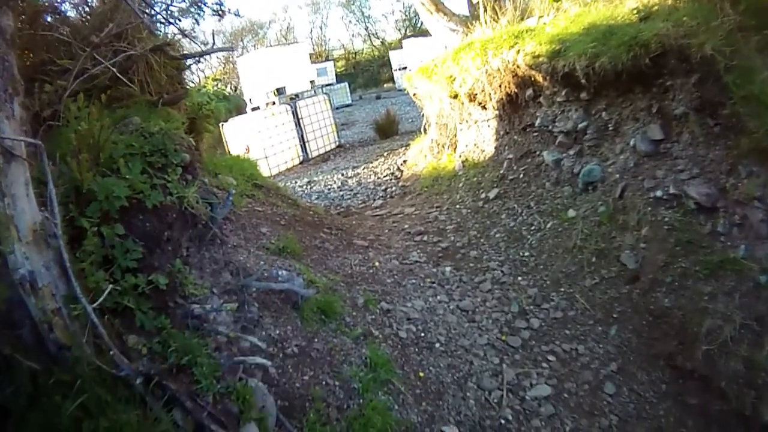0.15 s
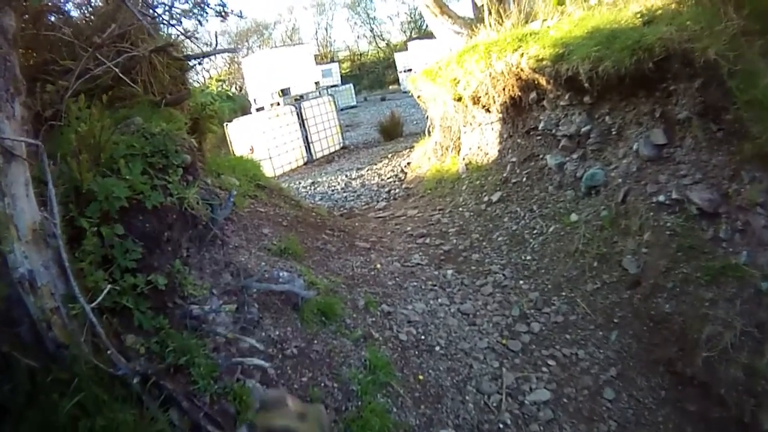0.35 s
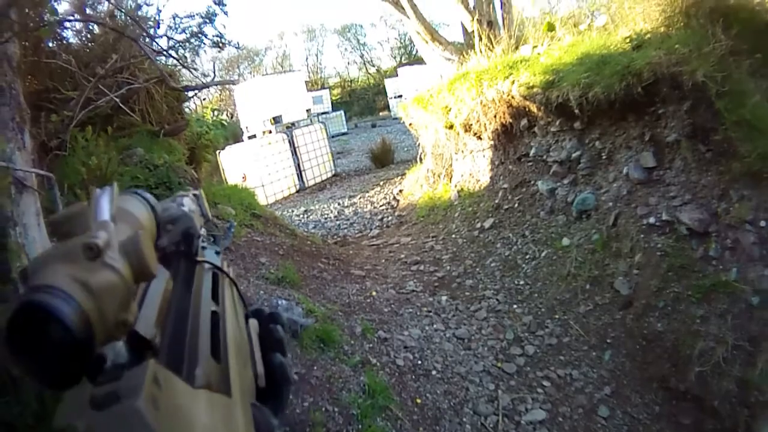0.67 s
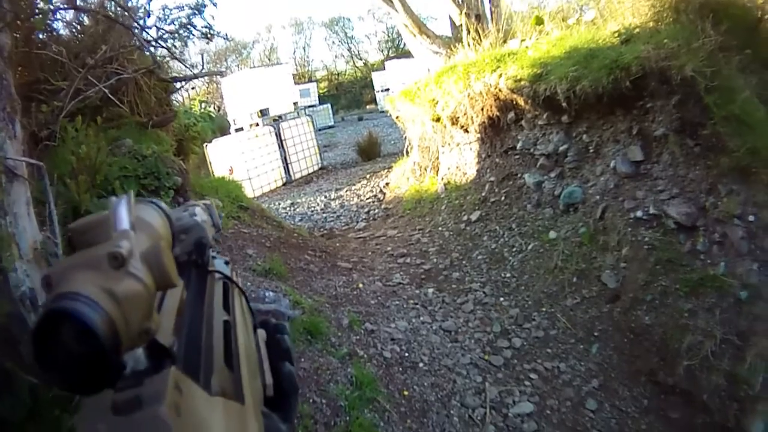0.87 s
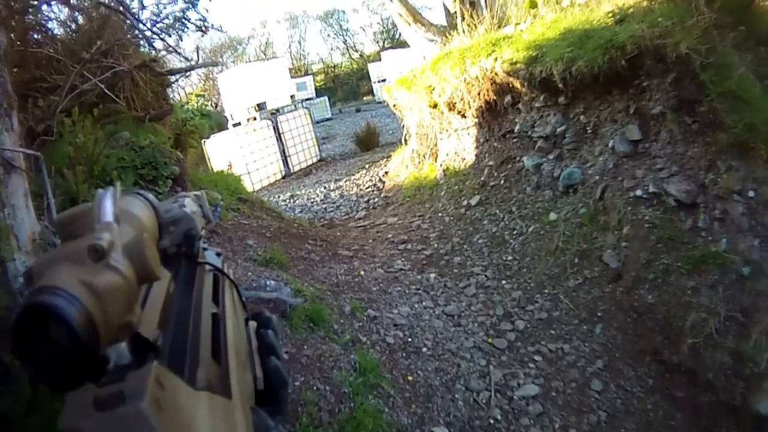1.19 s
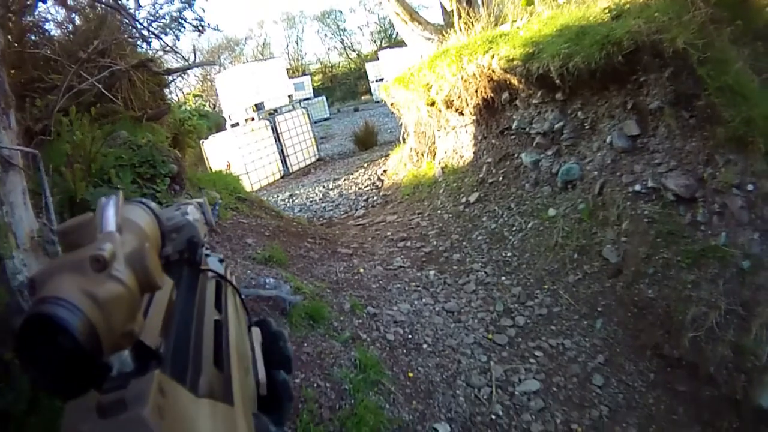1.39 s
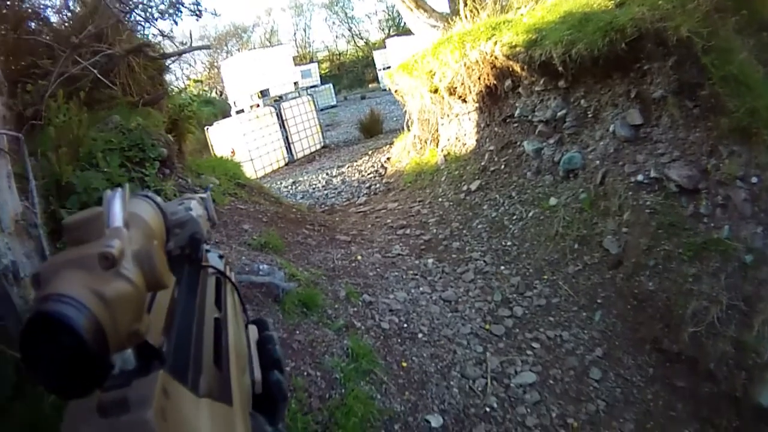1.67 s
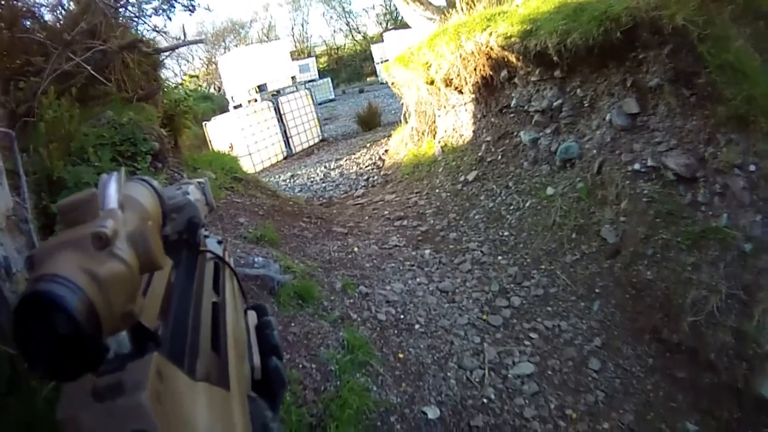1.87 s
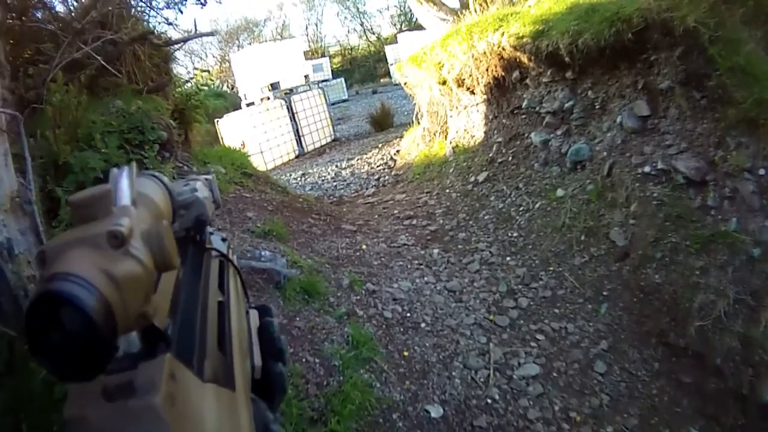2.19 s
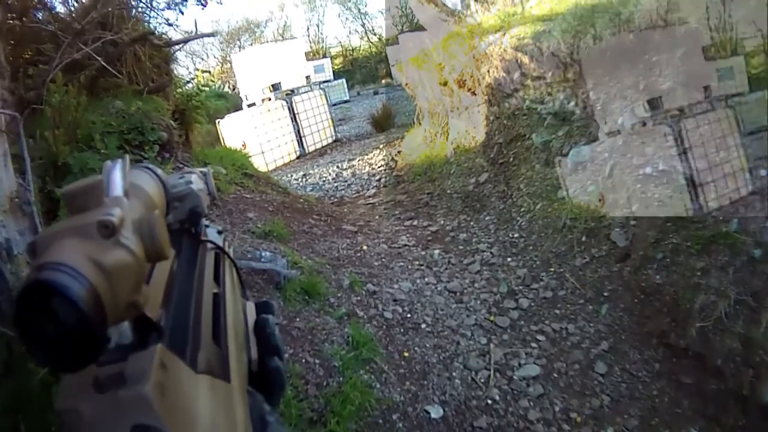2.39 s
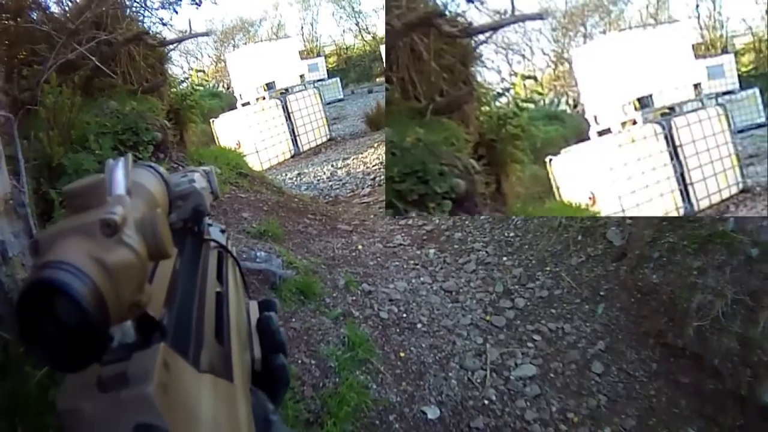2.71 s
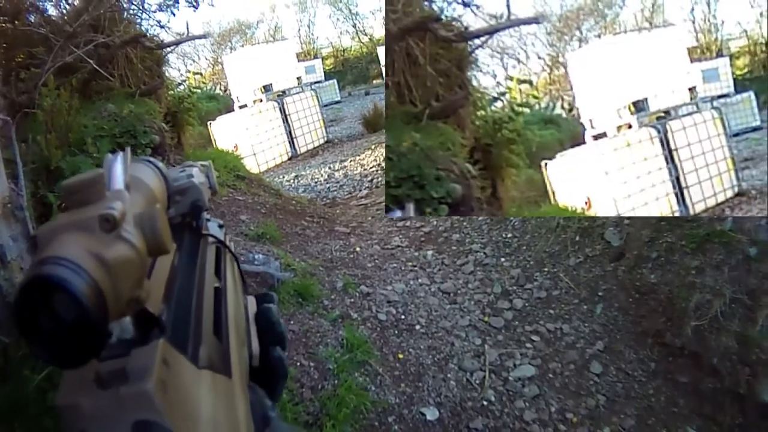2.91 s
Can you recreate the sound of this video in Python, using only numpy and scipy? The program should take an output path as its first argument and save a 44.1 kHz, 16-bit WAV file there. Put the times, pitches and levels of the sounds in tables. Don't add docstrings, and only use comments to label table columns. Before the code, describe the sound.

An electric toy rifle fires two loud, clattering shots up close after a quiet outdoor wait.

```python
import sys
import numpy as np
from scipy import signal
from scipy.fft import rfft, irfft, next_fast_len
from scipy.io import wavfile
from scipy.ndimage import map_coordinates

SR = 44100
rng = np.random.default_rng(int(sys.argv[2]) if len(sys.argv) > 2 else 0)


def magnitude_from_level(level_db):
    exponent = np.asarray(level_db, float) / 20
    return 10 ** exponent


def inscribe(sig):
    pcm = np.round(np.clip(np.atleast_2d(sig).T, -1, 1) * 32767)
    wavfile.write(sys.argv[1], SR, pcm.astype(np.int16))


N = 134505

# start t/s, piston release t/s, stop t/s, gear level/dB, whine level/dB
MOTOR_RUNS = [
    (2.628, 2.661, 2.734, -15, -22),
    (2.833, 2.8796, 2.985, -15.5, -23),
    (3.03, 3.077, 3.15, -13, -23),
]


def unit(x):
    return x / np.sqrt(np.mean(x ** 2) + 1e-20)


def along(points, hz):
    f, v = np.transpose(points)
    return np.interp(np.log(hz + 1), np.log(f + 1), v)


def wobble(rate):
    knots = rng.standard_normal(int(N * rate / SR) + 4)
    return map_coordinates(knots, [np.arange(N) * rate / SR])


def filtered(x, response):
    m = next_fast_len(len(x) + 8192)
    return irfft(rfft(x, m) * response(np.fft.rfftfreq(m, 1 / SR)), m)[:len(x)]


def peak(f, hz, width):
    return 1j * f * width / (hz * hz - f * f + 1j * f * width)


def add(out, s, sound):
    part = out[round(s * SR):][:len(sound)]
    part += sound[:len(part)]


def puff(response, t60, rise=0.00019):
    t = np.arange(SR // 8) / SR
    noise = unit(filtered(rng.standard_normal(len(t)), response))
    return noise * magnitude_from_level(-60 * t / t60) * (1 - np.exp(-t / rise))


def struck(hz, t60):
    t = np.arange(SR // 20) / SR
    onset = 1 - np.exp(-(t / .00025) ** 2)
    return magnitude_from_level(-60 * t / t60) * onset * np.sin(2 * np.pi * hz * t)


def outdoors():
    # f/Hz, level/dB
    rumble_tone = [(8.8, -36), (15, 0.5), (76, -2.5), (97, -7.5), (135, -4), (272, -16.5), (622, -16.5),
                   (668, -18), (1000, -35.5), (1300, -43), (2200, -120)]
    # f/Hz, level/dB
    leaf_tone = [(600, -22), (950, -9), (1400, 1.5), (2100, -0.5), (3400, -2), (5200, -9), (5700, -14),
                 (8500, -28), (11000, -52)]
    # t/s, level/dB
    leaf_swell = [(0, 1.5), (.42, -0.5), (.75, 0.5), (1.15, -2), (1.45, -1.5), (1.7, 1.5), (2.25, 2),
                  (2.6, 4.5), (3.05, 11)]
    # t/s, level/dB
    hiss_level = [(0, -69), (2.2, -70), (2.4, -66.5), (2.95, -59.5), (3.05, -59)]
    # f/Hz, level/dB, width/Hz
    hums = [(75.9, -51.5, 4.4), (5144, -74.5, 120), (10220, -86, 90)]
    rumble_db, leaf_db = -41.5, -54
    whistle_hz, whistle_db = 10220, -78.5
    t = np.arange(N) / SR

    def noise(response):
        return unit(filtered(rng.standard_normal(N), response))

    rumble = magnitude_from_level(rumble_db + .6 * wobble(14)) * noise(lambda f: magnitude_from_level(along(rumble_tone, f)))
    swell = np.interp(t, *np.transpose(leaf_swell)) + 0.29 * wobble(14.9)
    leaves = magnitude_from_level(leaf_db + swell) * noise(lambda f: magnitude_from_level(along(leaf_tone, f)))
    whistle = magnitude_from_level(whistle_db + wobble(8)) * np.sin(2 * np.pi * whistle_hz * t + .4 * wobble(30))
    hiss = magnitude_from_level(np.interp(t, *np.transpose(hiss_level))) * noise(lambda f: peak(f, 9400, 12000))
    hum = sum(magnitude_from_level(db) * noise(lambda f: peak(f, hz, w) ** 2) for hz, db, w in hums)
    return rumble + leaves + whistle + hiss + hum


def rustle():
    # t/s, peak level/dB, ring f/Hz
    buckles = [(.085, -38, 3000), (.118, -39, 3140), (0.158, -36, 4730), (0.187, -38, 4770),
               (.194, -38.5, 4760), (.292, -40, 2900), (0.46, -37, 2500), (0.497, -40, 4470),
               (.549, -32.5, 4370), (.5535, -42, 4400), (0.5754, -33.5, 2800), (.5985, -37, 3950),
               (0.685, -39, 4000), (.7635, -41, 3800), (0.771, -40, 3600), (0.885, -34, 3130),
               (1.70, -40, 4950), (2.28, -42, 7500)]
    # centre t/s, length/s, level/dB, centre f/Hz
    rubs = [(0.167, 0.013, -50.5, 2300), (0.263, 0.026, -47, 350), (0.258, .02, -54, 750),
            (0.42, .015, -54, 1000), (0.263, 0.028, -43, 28), (1.16, 0.051, -55.5, 320),
            (2.606, 0.023, -35.5, 120), (2.53, 0.06, -44, 111), (2.81, 0.042, -37.5, 137),
            (0.275, 0.051, -55, 3200), (.503, .008, -47.5, 2600), (0.37, .007, -53, 2000),
            (0.615, .02, -54.5, 3900), (0.79, 0.019, -44.5, 410), (0.77, 0.023, -50, 1120),
            (0.765, 0.08, -53, 3500), (1.974, 0.038, -53.5, 3300), (1.978, 0.018, -48, 410)]
    out, t = np.zeros(N), np.arange(N) / SR
    for s, db, hz in buckles:
        tick = puff(lambda f: peak(f, hz, 1.6 * hz) ** 2 / (1 + (f / 7000) ** 8), .014)
        add(out, s, magnitude_from_level(db - 6) * tick)
    for s, length, db, hz in rubs:
        grain = rng.standard_normal(N) * magnitude_from_level(4 * wobble(250))
        rub = unit(filtered(grain, lambda f: peak(f, hz, 1.2 * hz) ** 2 / (1 + (f / 6500) ** 4)))
        out += magnitude_from_level(db) * np.exp(-((t - s) / length) ** 2) * rub
    return out


def far_rifle():
    # first shot t/s, last shot t/s, rate/Hz, first level/dB, last level/dB
    bursts = [
        (1.152, 1.61, 24.5, -43.5, -45),
        (1.639, 1.89, 24.5, -46, -45),
        (2.602, 3.05, 24.6, -34, -41.5),
    ]
    # t/s, peak level/dB, ring f/Hz
    timed_burst_shots = [(1.9138, -39.5, 2040), (1.9527, -39.5, 2070), (1.9702, -37.5, 2120),
                         (2.036, -37.5, 2020), (2.0694, -38.5, 2120), (2.1163, -37, 2240), (2.1483, -35, 2010),
                         (2.1877, -36, 2070), (2.2411, -37, 2940), (2.2635, -41.5, 2310), (2.2795, -32, 2120),
                         (2.3169, -31.5, 2300), (2.3418, -37, 2240), (2.361, -32, 3470), (2.4025, -33, 2980),
                         (2.4436, -32.5, 2190), (2.484, -33.5, 2170), (2.5249, -33, 2950), (2.5647, -30.5, 2440),
                         (2.5928, -18, 4150)]
    # f/Hz, level/dB
    shot_tone = [(590, -38), (1000, -6), (1240, -21), (1480, -9), (1630, -8.5), (2130, 4), (2670, -8.5),
                 (3430, 0), (9000, -28.5), (11700, -61), (19800, -120)]
    ring_db, body_db, wash_db = -5.5, -6.5, -12
    out = np.zeros(N)

    def shot_noise(t60, rise):
        return puff(lambda f: magnitude_from_level(along(shot_tone, f)), t60, rise)

    def body():
        return shot_noise(t60=.085, rise=.003)

    def wash():
        return shot_noise(t60=0.3, rise=.015)

    for first, last, rate, db, end_db in bursts:
        for s in np.arange(first, last, 1 / rate):
            level = np.interp(s, [first, last], [db, end_db]) + rng.normal(0, 1)
            add(out, s, magnitude_from_level(level - 2.0) * body())
            add(out, s, magnitude_from_level(level - 11.0 + wash_db) * wash())
    for s, db, hz in timed_burst_shots[:-1]:
        add(out, s, magnitude_from_level(db + ring_db) * puff(lambda f: peak(f, hz, 350) ** 2, .04, rise=0.0028))
        add(out, s, magnitude_from_level(db + body_db) * body())
        add(out, s, magnitude_from_level(db + body_db + wash_db) * wash())
    return out


def banks(x):
    out, step_s = np.zeros(N), .02
    for s in np.arange(MOTOR_RUNS[0][0] - .06, N / SR, step_s):
        tail = puff(lambda f: peak(f, 1630, 6600) * peak(f, 2300, 14000), t60=0.16, rise=0.0092)
        piece = x[round(s * SR):round((s + step_s) * SR)]
        add(out, s, signal.fftconvolve(piece, tail / np.linalg.norm(tail)))
    return out


def latches():
    # t/s, peak level/dB, ring f/Hz, low knock level/dB
    ticks = [(2.583, -30, 3520, -32.5), (2.593, -15, 3830, -25), (2.6442, -4, 3300, -10.5),
             (2.6962, -5.5, 2920, -11), (2.708, -18, 4970, -25), (2.7543, -3.5, 3150, -19),
             (2.7566, -11.5, 2920, -10), (2.7592, -19, 3220, -15.5), (2.7803, -25, 3260, -30),
             (2.7817, -13, 3260, -15), (2.785, -15.5, 2030, -26), (2.7914, -22, 3340, -30),
             (2.7957, -16.5, 2050, -32), (2.801, -23, 2900, -27.5), (2.633, -17, 2930, -32),
             (2.7008, -13, 3570, -17.5), (2.8586, -11, 3340, -25), (2.876, -6, 4140, -14),
             (2.9205, -13, 3620, -14.5), (2.9276, -16, 3040, -17), (2.8213, -21, 4200, -49),
             (2.8225, -17.5, 6360, -51), (2.8343, -20, 3480, -37), (2.8423, -16, 3300, -23),
             (2.846, -9.5, 2980, -11.5), (2.907, -2.5, 3530, -8.5), (2.911, -8, 3650, -22),
             (2.9437, -5, 4220, -12.5), (2.958, -12.5, 3440, -17.5), (2.963, -13, 2040, -37),
             (2.9928, -16.5, 2800, -26.5), (3.0295, -14.5, 3700, -23.5)]
    # t/s, peak level/dB, ring f/Hz
    pings = [(2.662, -29, 8200), (2.7082, -32, 13500), (2.7545, -33, 8400), (2.7802, -43, 8400),
             (2.7912, -46, 8500), (2.797, -49, 8600), (2.8215, -27.5, 8200), (2.672, -13.5, 13000),
             (2.8908, -17, 14400), (2.6768, -20, 10800), (2.895, -35, 11500), (2.9, -17, 7900),
             (2.9195, -35, 13800), (2.9455, -40, 12000)]
    tick_t60_s, ring_db = 0.023, -4.5
    knock_hz, knock_t60_s = 530, 0.029
    out = np.zeros(N)
    for s, db, hz, knock_db in ticks:
        rattle = puff(lambda f: peak(f, hz, 0.68 * hz) ** 2 / (1 + (f / 7000) ** 6), tick_t60_s)
        knock = puff(lambda f: peak(f, knock_hz, 630) ** 2, knock_t60_s, rise=0.00046)
        add(out, s, magnitude_from_level(db + ring_db) * struck(hz, 0.61 * tick_t60_s))
        add(out, s, magnitude_from_level(db - 8.5) * rattle)
        add(out, s, magnitude_from_level(knock_db) * knock)
    for s, db, hz in pings:
        add(out, s, magnitude_from_level(db) * puff(lambda f: peak(f, hz, 0.22 * hz) ** 2, t60=.012))
    return out


def brief_tones():
    songs = [(2.656, 0.0084, 5000, -30), (2.642, 0.006, 600, -16.5), (2.72, 0.013, 640, -23),
             (2.851, 0.0046, 560, -16), (2.872, 0.0087, 2020, -18), (2.868, 0.0057, 4070, -18),
             (2.925, 0.0093, 2020, -22.5), (2.942, 0.0089, 600, -19)]
    t = np.arange(N) / SR
    out = np.zeros(N)
    for s, length, hz, db in songs:
        tone = np.sin(2 * np.pi * hz * t + .5 * wobble(150))
        out += magnitude_from_level(db) * np.exp(-((t - s) / length) ** 2) * tone
    return out


def gears():
    # f/Hz, width/Hz, level/dB
    resonances = [(357, 300, -5.5), (626, 198, 2), (840, 290, -5.5), (1120, 250, -9.5), (2064, 190, -3),
                  (1510, 450, -13.5), (2800, 750, -4.5), (3560, 450, 1), (4070, 540, -5.5), (4490, 360, -0.5),
                  (5360, 550, -9), (6120, 400, -8), (8600, 1250, -16.5)]
    teeth_per_s, tooth_scatter_db, grind_db = 1800, 3, -3
    spin_up_s, slack_s, pick_up_s, coast_s = 0.023, 0.0025, 0.023, 0.048
    start_db, slack_db, after_db, stop_db = -14, -1, -4, -29
    whine_from_hz, whine_hz_per_s, whine_s = 770, 33200, 0.03
    patch_db, patch_per_s = 2.5, 140
    top_roll_hz = 7500
    t = np.arange(N) / SR
    size = magnitude_from_level(tooth_scatter_db * rng.standard_normal(N))
    teeth = (rng.random(N) < teeth_per_s / SR) * size * rng.choice([-1, 1], N)
    drive = unit(teeth) + magnitude_from_level(grind_db) * rng.standard_normal(N)
    load, whine = np.zeros(N), np.zeros(N)
    for start, release, stop, db, whine_db in MOTOR_RUNS:
        times = [start, start + spin_up_s, release, release + slack_s,
                 release + pick_up_s, release + coast_s, stop]
        shape = np.interp(t, times, [start_db, 0, 0, slack_db, after_db, after_db - 1.5, stop_db])
        load += magnitude_from_level(db + shape) * (t > start) * (t < stop)
        u = t - start
        hump = np.sin(np.pi * np.clip(u / whine_s, 0, 1)) ** 2
        turns = whine_from_hz * u + whine_hz_per_s * u * u / 2
        whine += magnitude_from_level(whine_db) * hump * np.sin(2 * np.pi * turns)
    modes = [(-1) ** k * magnitude_from_level(db + patch_db * wobble(patch_per_s)) * drive
             for k, (hz, width, db) in enumerate(resonances)]

    def ring(gain):
        return sum(filtered(x * gain, lambda f: peak(f, hz, width) / (1 + 1j * f / top_roll_hz) ** 3)
                   for x, (hz, width, db) in zip(modes, resonances))

    return ring(load) / np.std(ring(1)) + whine


def piston():
    # delay after release t/s, f/Hz, peak level/dB, T60/s, direction
    swings = [(.0012, 340, -2, .033, 1), (.0056, 170, 0, .03, 1), (.0092, 250, -3, .026, -1),
              (.0132, 400, -5, .03, 1), (.0056, 95, -12, .06, 1), (.002, 700, -13, .03, -1),
              (.0135, 280, -12, .05, -1)]
    # t/s, peak level/dB, ring f/Hz, T60/s
    slams = [(2.6692, -4, 5800, .011), (2.6708, -7, 5400, .01), (2.6722, 3, 4450, .007),
             (2.6731, 6, 4450, .0045), (2.6767, 0, 4600, .004), (2.6795, -13, 4800, .02),
             (2.8876, -8, 4500, .01), (2.8885, -3, 6050, .013), (2.8894, -2, 4450, .01),
             (2.8909, 4, 4060, .007), (2.8916, 1, 5600, .005), (2.8951, -7, 3900, .004),
             (2.8975, -17, 5500, .022)]
    # f/Hz, level/dB
    slam_tone = [(800, -26), (2500, -13), (4500, -4), (7000, -13), (10000, -21), (13500, -22), (15500, -30)]
    swing_rise_s = 0.00087
    shudder_db, shudder_hz, shudder_t60_s = -32, 213, 0.67
    ring_db, noise_db = -0.5, -3
    out, t = np.zeros(N), np.arange(SR // 10) / SR
    for start, release, *rest in MOTOR_RUNS:
        for delay, hz, db, t60, way in swings:
            envelope = magnitude_from_level(db - 60 * t / t60) * (1 - np.exp(-t / swing_rise_s))
            add(out, release + delay, way * envelope * np.sin(2 * np.pi * hz * t))
        shudder = puff(lambda f: peak(f, shudder_hz, 260) ** 2, shudder_t60_s, rise=0.005)
        add(out, release + .02, magnitude_from_level(shudder_db) * shudder)
    for s, db, hz, t60 in slams:
        noise = puff(lambda f: magnitude_from_level(along(slam_tone, f) - 4) + peak(f, hz, 700), t60)
        add(out, s, magnitude_from_level(db + noise_db) * noise)
        add(out, s, magnitude_from_level(db + ring_db) * struck(hz, 1.1 * t60))
    return out


def scene():
    near = gears() + brief_tones() + piston() + latches()
    echo = magnitude_from_level(-19) * banks(near)
    return (near + echo + far_rifle() + rustle() + outdoors())[None]


def band_limit(x):
    return signal.sosfilt(signal.butter(12, 15690, fs=SR, output="sos"), x)


def record(dry):
    top, knee, band_edge_hz = 1.0, 12, 15750
    limited = dry[0] / (1 + np.abs(dry[0] / top) ** knee) ** (1 / knee)
    mix = filtered(limited, lambda f: 1 / (1 + (f / band_edge_hz) ** 60))[None]
    return band_limit(mix)


dry = scene()
out = record(dry)
inscribe(out)
```